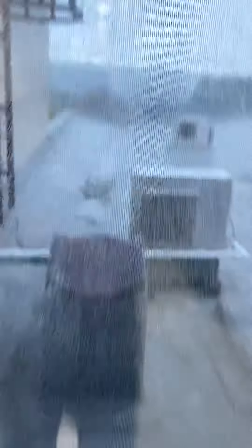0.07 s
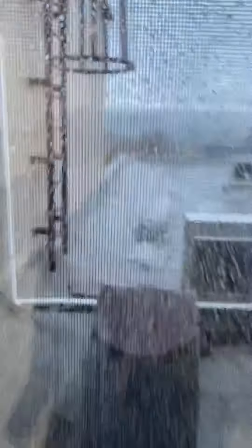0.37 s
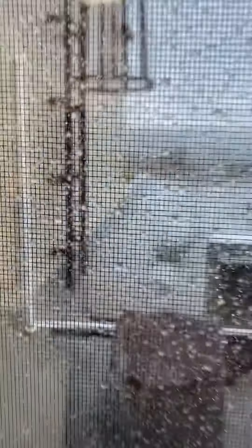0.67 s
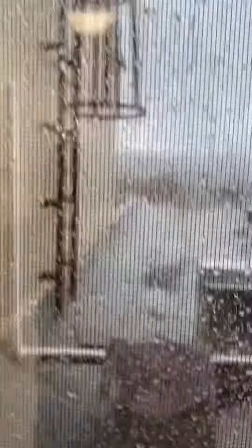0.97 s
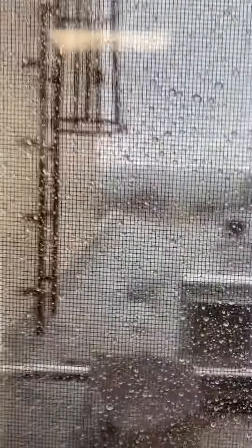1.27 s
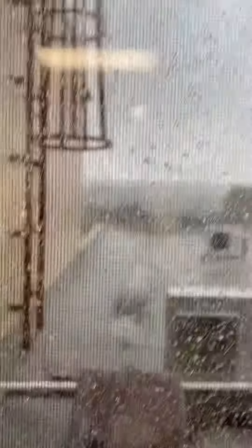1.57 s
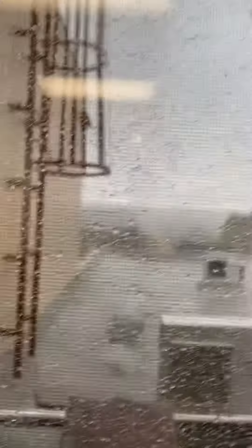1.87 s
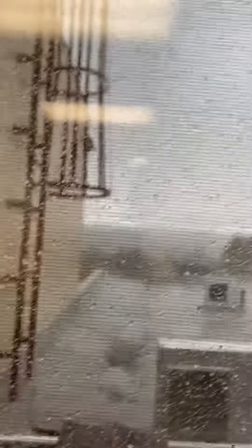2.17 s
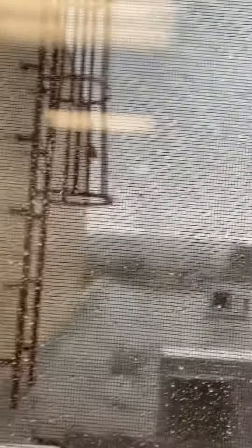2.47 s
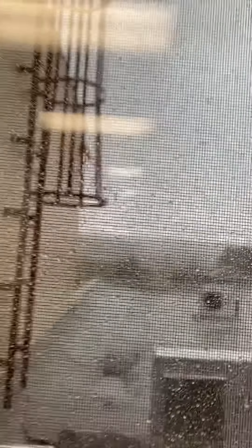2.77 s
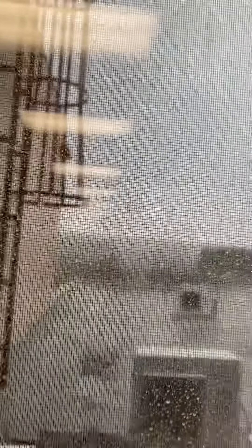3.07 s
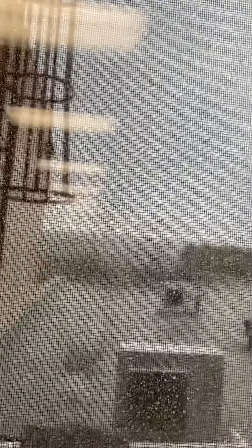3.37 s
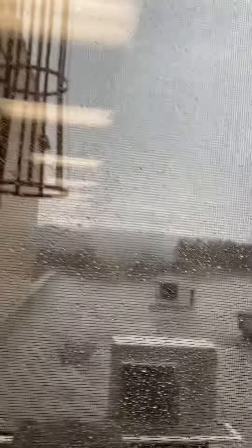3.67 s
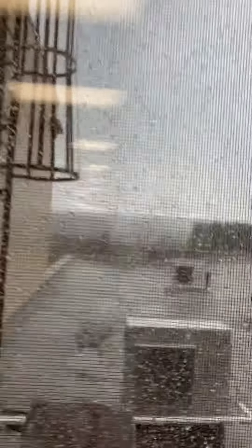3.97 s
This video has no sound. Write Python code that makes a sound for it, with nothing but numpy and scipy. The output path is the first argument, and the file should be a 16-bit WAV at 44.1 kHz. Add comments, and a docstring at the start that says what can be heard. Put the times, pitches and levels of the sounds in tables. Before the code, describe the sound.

Rain patters and hisses on a window, heard close from indoors, over low wind rumble and water drumming on the roof. Brief spray sizzles at the start and heavy drips thud through the first second; large drops splat throughout. Gusts boom against the pane from 0.5 seconds, hardest around 1.2. A sheet of rain peaks at 1.5 seconds, then the storm eases, with a last thump near 3.4.

```python
"""A rainstorm heard from indoors, close to a window above a flat roof.
From the start, wind makes the building rumble, water drums outside and fine rain hisses on the glass.
Right away the frame rings, spray sizzles and heavy drips begin to thud; large drops then splat throughout.
From about half a second, gusts thump the pane and set it booming, hardest just after one second.
A sheet of rain peaks at a second and a half; then the storm eases, with a last thump near the end."""
import sys
import numpy as np
from scipy import signal
from scipy.fft import rfft, irfft
from scipy.io import wavfile
from scipy.ndimage import uniform_filter1d

SR = 44100
rng = np.random.default_rng(int(sys.argv[2]) if len(sys.argv) > 2 else 0)


def waveform_to_disk(signal):
    """Save audio, clipped to [-1, 1], as 16-bit WAV at the path in sys.argv[1]."""
    frames = np.transpose(np.atleast_2d(signal))
    scaled = np.clip(frames, -1, 1) * 32767
    samples = np.round(scaled).astype(np.int16)
    wavfile.write(sys.argv[1], SR, samples)


N = 176400
T = np.arange(N) / SR
HZ = np.maximum(np.arange(N // 2 + 1) * SR / N, 1)

# strength of the gusts and of the deep rumble (time [s], level [dB])
GUST_LEVEL = [(0, -48.5), (0.3, -52.5), (0.5, -47), (0.58, -44), (0.76, -43), (0.88, -48), (1.1, -47.5),
              (1.18, -41.5), (1.27, -42.5), (1.36, -44), (1.65, -44), (2.25, -50), (2.44, -47), (2.56, -52),
              (3.35, -53), (3.43, -47), (3.62, -48.5), (4, -53)]
RUMBLE_LEVEL = [(0.0, -47), (0.54, -47.5), (0.6, -39), (0.66, -45.5), (1.11, -42.5), (1.16, -43),
                (1.32, -43.5), (1.8, -43.5), (1.84, -48.5), (2.18, -44), (2.22, -50.5), (2.45, -44),
                (2.49, -56), (2.56, -47.5), (3.39, -50), (3.42, -43), (3.45, -45.5), (4.0, -50)]
# modes, the pitches at which building, wall, pane and glass ring (pitch [Hz], width [Hz], level [dB])
BUILDING_MODES = [(31.1, 10, -0.5), (61.4, 20, -1), (121.5, 13, -4.5), (263, 16.6, -3)]
DEEP_MODES = [(75.2, 22.2, -4.5), (118, 12.1, -0.5), (165.8, 8.6, -6.5)]
PANE_MODES = [(260.2, 23.8, -1), (350, 35, -11), (406.6, 46, -10.5), (436, 3.4, -22.5), (610, 69, -18.5)]
GLASS_MODES = [(1170, 140, -4), (1950, 220, -3), (2450, 190, 0), (3065, 260, -7), (5180, 520, -6)]
# rain thrown at the pane (time [s], patter level [dB], hiss level [dB])
RAIN_LEVEL = [(0, -63, -63), (.12, -62, -67), (.19, -61.5, -72), (.3, -61.5, -63.5), (.43, -64.5, -78),
              (.6, -67, -75), (.8, -71.5, -87), (.95, -65, -73.5), (1.1, -68.5, -82), (1.3, -64, -74),
              (1.53, -53.5, -63.5), (1.74, -67, -74), (2.05, -66.5, -78.5), (2.4, -67.5, -78.5),
              (2.85, -67.5, -76.5), (3.46, -64, -74), (3.62, -72, -83), (3.74, -67, -78), (4, -66, -77)]
# one thin ring in the frame (time [s], length [s], pitch [Hz], level [dB])
FRAME_RING = (0.0, .034, 5520, -62)
# bursts of close spray (time [s], length [s], level [dB], sizzle above that level [dB])
SPRAY_BURSTS = [(0.066, 0.018, -52.5, -1.5), (0.09, 0.014, -51.5, -13), (0.258, 0.016, -58, 4.5)]
# heavy drips outside (time [s], level [dB], dull above [Hz])
THUDS = [(0.038, -35, 2600), (0.365, -36.5, 970), (0.555, -34, 700), (0.686, -45, 900), (0.766, -53, 900),
         (0.911, -40, 700), (1.931, -35, 400)]
# large drops on the glass (time [s], level [dB], knock share [dB], splash share [dB], ring pitch [Hz])
LARGE_DROPS = [(0.1394, -64.5, -16, 9, 1900), (0.2119, -42.5, -10.5, -37, 2430),
               (0.3823, -42, -2.5, -18.5, 1920), (0.461, -70.5, 2, 1.5, 2280),
               (0.6474, -48, -11, -13, 3240), (0.879, -68.5, -10, -6, 2400), (0.936, -60, -10, -12, 2520),
               (0.984, -62.5, -14, -7.5, 2150), (1.207, -62, 7, -35, 2040),
               (1.2735, -46.5, -25, -16.5, 3100), (1.3276, -52, -16, -13, 3610), (1.485, -69, 0, -19, 2450),
               (1.517, -51.5, -3.5, -12, 2390), (1.8456, -57.5, 4.5, -25, 2170),
               (2.276, -59, -26, -11, 2300), (2.5183, -56.5, -14, -14.5, 2450),
               (2.571, -62.5, -12, -9, 1920), (2.641, -67.5, -16, -1.5, 2470),
               (2.7665, -52.5, -5.5, -7.5, 2030), (2.812, -54.5, -0.5, -23, 2400),
               (2.8404, -63, -8, -4.5, 2080), (2.8848, -63.5, 5.5, -9, 2020), (2.9996, -63, -14, -12, 2530),
               (3.0893, -58, -2, -7, 2900), (3.119, -44, -8, -17, 2450), (3.335, -57, -13, -7.5, 2020),
               (3.47, -56.5, -2, -6.5, 2100), (3.8974, -71, -3, -1.5, 2330)]
# modes of the frame that every large drop sets ringing (pitch [Hz], level [dB])
FRAME_MODES = [(1160, -13), (5140, -8), (6150, -14)]
# swells of one mode of pane or wall (peak time [s], half length [s], pitch [Hz], level [dB])
BOOMS = [(0.591, 0.024, 121, -39.5), (0.617, 0.032, 610, -50.5), (0.719, 0.059, 264, -40.5),
         (0.78, 0.023, 408, -45.5), (1.186, 0.049, 71.55, -41.5), (1.195, 0.015, 250, -44),
         (1.235, .04, 350, -45.5), (1.281, 0.038, 256, -45.5), (1.653, 0.026, 385, -49),
         (1.931, 0.0081, 254, -40), (2.096, 0.072, 59, -45.5), (2.434, 0.018, 248.3, -39.5)]
# slaps of wind on the pane (time [s], level [dB])
BUFFETS = [(.585, -49), (1.15, -43.5), (1.221, -40.5), (3.403, -45)]
# tone colour of each sound, from bass to treble (frequency [Hz], level [dB])
RUMBLE_TONE = [(15, -6), (25, -15), (40, -22.5), (58, 5.5), (95, -4.5), (145, 0), (200, -12), (320, -13.5),
               (700, -76)]
ROAR_TONE = [(100, -20.5), (190, 1.5), (250, -1.5), (400, -6), (520, -10), (700, -12), (1000, -22.5),
             (1600, -33), (4000, -93)]
PATTER_TONE = [(400, -11.5), (900, 12), (1600, 6), (2350, 7), (3700, 6.5), (4600, 2), (5200, 4),
               (6200, 2.5), (8500, -80), (16000, -26)]
HISS_TONE = [(2000, -6), (5000, 2), (7000, -3), (9000, 9), (11200, 8), (13000, 5.5), (16000, -3.5)]
FAR_RAIN_TONE = [(200, 10), (600, 7), (1100, 4.5), (1700, 2), (2400, 1), (3500, -19), (6000, -38),
                 (16000, -40)]
SPRAY_TONE = [(1200, -17), (2800, -22), (3900, 3.5), (4800, -8), (5600, -7), (9000, -8), (16000, -4.5)]
THUD_TONE = [(80, 17), (200, -10), (500, 3.5), (900, 0), (1800, -10.5), (4000, -35)]
KNOCK_TONE = [(300, -8), (700, 4), (950, 3), (1150, 8.5), (1400, -6.5), (1900, 5), (4000, -26.5)]
SPLAT_TONE = [(600, -22), (1500, -56), (2300, 11.5), (3600, 5.5), (5200, 8.5), (6500, 4.5), (9000, -1),
              (16000, -33)]
BUFFET_TONE = [(25, -5), (65, -10), (125, 10), (200, -24), (300, -12), (480, -7.5), (900, -24), (4000, -97)]
# how alike the room sounds in the two ears (frequency [Hz], likeness [0 to 1])
EAR_LIKENESS = [(60, 0.99), (200, 1), (380, 0.92), (700, 0.28), (1300, 0.14), (2200, 0), (3200, 0.072),
                (4200, 0.0076), (6000, 0), (16000, 0)]
# how the room's low sounds lean to the right (frequency [Hz], left minus right [dB])
BALANCE = [(30, -1.5), (60, -0.5), (125, -2), (260, -3.5), (500, -3), (1000, 0)]
# how far the pane's sound is ahead in the left ear (frequency [Hz], phase lead [radians])
WINDOW_LEAD = [(0, 0), (400, .3), (1200, 1.6), (2000, .4), (3000, 1.7), (4000, .9), (5000, .3), (6000, 1.3),
               (7300, 3.14), (10400, 6.28), (13400, 9.42), (16000, 12.3)]

RUMBLE_DB, DEEP_MODES_DB, BUILDING_DB, ROAR_DB, PANE_DB = -6.5, -2.5, -55, -3, -1.5
DRUMS_PER_S, PATTER_PER_S, HISS_PER_S = 500, 2500, 5600
PATTER_DB, GLASS_DB, HISS_DB, FAR_RAIN_DB = -2.5, -19, -0.5, -62.5
CLUMPS_PER_S, CLUMP_DB, CLUMP_DECAY_S = 4.2, 12, 0.012
PINGS_PER_S, PING_WIDTH_HZ, PING_DB = 150, 30, -8
SPRAY_EDGE_S, THUD_DECAY_S, BUFFET_RISE_S = 0.004, 0.0075, 0.017
DROP_DB, KNOCK_DB, SPLASH_DB, UNEVEN_DB = -8, 5, 19.5, 4
IMPACT_RISE_S, SPLAT_S, SPLAT_TAIL_DB, SPLAT_TAIL_S = 0.0017, 0.0078, 0.5, 0.015
SPLASH_RISE_S, SPLASH_DECAY_S, RING_DB, RING_DECAY_S = 0.0008, 0.005, -1.5, 0.01
MIDDLING_DROP_DB, RING_GROWTH = -50.5, 0.1   # heavier drops ring more: extra dB per dB of drop
HISS_ROOM_DB, ROOM_DULLS_HZ, CUTOFF_HZ = -13, 9000, 15950


def from_db(db):
    """Turn decibels into a number to multiply by."""
    return 10 ** (np.asarray(db) / 20)


def rms_one(x):
    """Scale a sound so that its average strength (rms) is 1."""
    return x / np.sqrt(np.mean(x ** 2) + 1e-20)


def in_time(rows):
    """Read a table's level columns at every sample."""
    s, *columns = np.transpose(rows)
    return [np.interp(T, s, c) for c in columns]


def at_hz(points):
    """Read a table at every frequency, joining its points on a pitch scale."""
    hz, value = np.transpose(points)
    return np.interp(np.log(HZ), np.log(hz), value)


def colour(x, tone):
    """Give a sound a tone colour, at strength 1."""
    return rms_one(irfft(rfft(x) * from_db(at_hz(tone)), N))


def white():
    """Two unrelated, even noises."""
    return rng.standard_normal((2, N))


def sine(hz, t):
    """A pure tone of strength 1, starting anywhere in its swing."""
    return np.sqrt(2) * np.sin(2 * np.pi * (hz * t + rng.random()))


def grains(per_s, spread_db, smooth):
    """Two unrelated streams of tiny random hits of uneven size, over a smooth wash."""
    sizes = from_db(spread_db * np.minimum(rng.exponential(1, (2, N)), 4)) * rng.choice([-1, 1], (2, N))
    lands = rng.random((2, N)) < per_s / SR
    return rms_one(rms_one(sizes * lands) + smooth * white())


def in_room(pair):
    """Sound spread around the room: alike in both ears in the bass, different in the treble."""
    mid, side = rfft(pair)
    alike = np.clip(at_hz(EAR_LIKENESS), -.999, .999)
    sign = np.array([[1], [-1]])   # left, right
    ears = np.sqrt((1 + alike) / 2) * mid + sign * np.sqrt((1 - alike) / 2) * side
    return irfft(ears * from_db(sign * at_hz(BALANCE) / 2), N)


def from_window(x):
    """Sound straight from the pane reaches the right ear a little later."""
    lag = np.interp(HZ, *np.transpose(WINDOW_LEAD))
    return np.array([x, irfft(rfft(x) * np.exp(-1j * lag), N)])


def on_glass(pair, tone, room_db):
    """Sound straight from the pane plus a duller share from the room, at strength 1."""
    room = in_room(np.array([pair[1], rng.standard_normal(N)]))
    dull_room = irfft(rfft(room) / (1 + (HZ / ROOM_DULLS_HZ) ** 4), N)
    return colour(from_window(pair[0]) + from_db(room_db) * dull_room, tone)


def ring(x, hz, width_hz):
    """Let a sound ring at one pitch; a smaller width rings longer."""
    r = np.exp(-np.pi * width_hz / SR)
    feedback = [1, -2 * r * np.cos(2 * np.pi * hz / SR), r * r]
    return signal.lfilter(np.array([1, 0, -1]) * (1 - r * r) / 2, feedback, x)


def uneven(x, count):
    """Random peaks and dips in the tone: each spot on the pane has a colour of its own."""
    spectrum = rfft(x)
    places = np.linspace(0, count - 1, spectrum.shape[-1])
    bumps = np.interp(places, np.arange(count), rng.standard_normal(count))
    return rms_one(irfft(spectrum * from_db(UNEVEN_DB * bumps), x.shape[-1]))


def burst(s, length_s):
    """A level that rises quickly at time s, holds, then dies away."""
    rise = np.clip((T - s) / SPRAY_EDGE_S, 0, 1)
    return rise * np.exp(-np.maximum(T - s - length_s, 0) / SPRAY_EDGE_S)


def shaken(modes, steady):
    """Modes shaken by swirling air; 'steady' evens out their swelling and fading."""
    out = 0
    for hz, width_hz, db in modes:
        off_pitch = (HZ / hz - hz / HZ) * hz / (width_hz * np.pi / 2)
        hum = rms_one(irfft(rfft(in_room(white())) / (1 + 1j * off_pitch) ** 2, N))
        power = uniform_filter1d(np.mean(hum ** 2, axis=0), size=6000) + 1e-6
        out = out + from_db(db) * rms_one(hum / power ** (steady / 2))
    return out


def wind():
    """Gusts shake the building and the pane, and drive water drumming onto the roof."""
    gust_gain, rumble_gain = from_db(in_time(GUST_LEVEL)[0]), from_db(in_time(RUMBLE_LEVEL)[0])
    rumble = from_db(RUMBLE_DB) * colour(in_room(white()), RUMBLE_TONE)
    rumble += from_db(DEEP_MODES_DB) * shaken(DEEP_MODES, steady=1.0)
    drumming = grains(DRUMS_PER_S, spread_db=3.0, smooth=0.79)
    roar = from_db(ROAR_DB) * colour(in_room(drumming), ROAR_TONE)
    building = from_db(BUILDING_DB) * shaken(BUILDING_MODES, steady=0.5)
    pane = from_db(PANE_DB) * shaken(PANE_MODES, steady=0.45)
    return building + rumble_gain * rumble + gust_gain * (roar + pane)


def rain():
    """Small drops patter and hiss on the pane and make it ring, over the wash of rain farther off."""
    patter_gain, hiss_gain = from_db(in_time(RAIN_LEVEL))
    hits = grains(PATTER_PER_S, spread_db=0.5, smooth=0.67)
    glass = sum(from_db(db) * rms_one(ring(hits, hz, width_hz)) for hz, width_hz, db in GLASS_MODES)
    patter = from_db(PATTER_DB) * on_glass(hits, PATTER_TONE, room_db=-0.5)
    patter += from_db(GLASS_DB) * (from_window(glass[0]) + 0.045 * in_room(glass[::-1]))
    fine_hits = grains(HISS_PER_S, spread_db=3.5, smooth=0.97)
    hiss = from_db(HISS_DB) * on_glass(fine_hits, HISS_TONE, HISS_ROOM_DB)
    far = from_db(FAR_RAIN_DB) * colour(in_room(grains(400, spread_db=0.5, smooth=1.0)), FAR_RAIN_TONE)
    return patter_gain * (clumps() * patter + pings()) + hiss_gain * clumps() * hiss + far


def clumps():
    """Droplets land in small clumps, so the level jumps briefly at random moments."""
    landings = (rng.random(N) < CLUMPS_PER_S / SR) * rng.random(N)
    surges = signal.lfilter([1], [1, -np.exp(-1 / (CLUMP_DECAY_S * SR))], landings + 1e-18)
    return 1 + from_db(CLUMP_DB) * surges


def pings(count=24):
    """Single drops ring briefly, each at one of 'count' pitches picked by chance."""
    sizes = from_db(4.1 * np.minimum(rng.exponential(1, N), 3))
    hits = sizes * (rng.random(N) < PINGS_PER_S / SR)
    picked = rng.integers(0, count, N)
    rings = sum(ring(hits * (picked == k) + 1e-18, hz, PING_WIDTH_HZ) / np.sqrt(hz)
                for k, hz in enumerate(np.geomspace(1400, 6500, count)))
    return from_db(PING_DB) * from_window(rms_one(rings))


def frame_ring():
    """The window frame gives one short, thin ring."""
    s, length_s, hz, db = FRAME_RING
    return from_window(from_db(db) * burst(s, length_s) * np.sin(2 * np.pi * hz * T))


def thuds():
    """Heavy drips land outside with a dull knock, some brighter than others."""
    body, out = colour(in_room(white()), THUD_TONE), 0
    for s, db, top_hz in THUDS:
        age = np.maximum(T - s, 0)
        level = from_db(db) * (1 - np.exp(-age / IMPACT_RISE_S)) * np.exp(-age / THUD_DECAY_S)
        out = out + signal.sosfilt(signal.butter(2, top_hz, fs=SR, output="sos"), level * body + 1e-18)
    return out


def spray():
    """Droplets land close by in short, sizzling bursts."""
    body_gain = sum(from_db(db) * burst(s, length_s) for s, length_s, db, _ in SPRAY_BURSTS)
    sizzle_gain = sum(from_db(db + extra) * burst(s, length_s) for s, length_s, db, extra in SPRAY_BURSTS)
    droplets = on_glass(grains(900, spread_db=0.0, smooth=0.4), SPRAY_TONE, room_db=-19)
    body = body_gain * uneven(droplets, count=70)
    sizzle = on_glass(grains(790, spread_db=1.5, smooth=0.25), HISS_TONE, HISS_ROOM_DB)
    return body + sizzle_gain * uneven(sizzle, count=50)


def large_drops(size=4096):
    """Each drop lands with a crisp splash, bursts into droplets and leaves glass and frame ringing."""
    knock = colour(in_room(white()), KNOCK_TONE)
    splat = on_glass(grains(2800, spread_db=0.5, smooth=0.25), SPLAT_TONE, room_db=-18.5)
    splash = on_glass(grains(9900, spread_db=11.5, smooth=0.76), HISS_TONE, HISS_ROOM_DB)
    age = np.arange(size) / SR
    rise = 1 - np.exp(-age / IMPACT_RISE_S)
    tail = from_db(SPLAT_TAIL_DB) * np.exp(-age / SPLAT_TAIL_S)
    body_shape = rise * (np.exp(-(age / SPLAT_S) ** 2) + tail)
    tick_shape = (1 - np.exp(-age / SPLASH_RISE_S)) * np.exp(-age / SPLASH_DECAY_S)
    out, rings = np.zeros((2, N + size)), np.zeros(N + size)
    for k, (s, db, knock_db, splash_db, ring_hz) in enumerate(LARGE_DROPS):
        part = np.s_[:, k * size:(k + 1) * size]   # each drop gets its own stretch of noise
        start, gain = int(s * SR), from_db(db + DROP_DB)
        body = uneven(splat[part], count=70) + from_db(knock_db + KNOCK_DB) * knock[part]
        tick = from_db(splash_db + SPLASH_DB) * uneven(splash[part], count=40)
        modes = sum(from_db(mode_db) * sine(hz, age) for hz, mode_db in [(ring_hz, RING_DB), *FRAME_MODES])
        weight = from_db(RING_GROWTH * (db - MIDDLING_DROP_DB))
        out[:, start:start + size] += gain * (body_shape * body + tick_shape * tick)
        rings[start:start + size] += gain * weight * rise * np.exp(-age / RING_DECAY_S) * modes
    return out[:, :N] + from_window(rings[:N])


def booms():
    """One mode of pane or wall builds up under a gust and dies away again."""
    swing = sum(from_db(db) * np.exp(-((T - s) / half_s) ** 2) * sine(hz, T)
                for s, half_s, hz, db in BOOMS)
    return in_room(np.array([swing, np.zeros(N)]))


def buffets():
    """A slap of wind on the pane gives a short, deep thump."""
    level = 0
    for s, db in BUFFETS:
        age = np.maximum(T - s, 0) / BUFFET_RISE_S
        level = level + from_db(db) * age * np.exp(1 - age)
    return level * colour(in_room(white()), BUFFET_TONE)


def scene():
    """The storm at the window: the sounds of wind plus the sounds of water."""
    return wind() + buffets() + booms() + rain() + large_drops() + spray() + frame_ring() + thuds()


def record(dry):
    """Cut away the very highest treble steeply."""
    return signal.sosfilt(signal.ellip(10, .2, 80, CUTOFF_HZ, fs=SR, output="sos"), dry)


dry = scene()
out = record(dry)
waveform_to_disk(out)
```